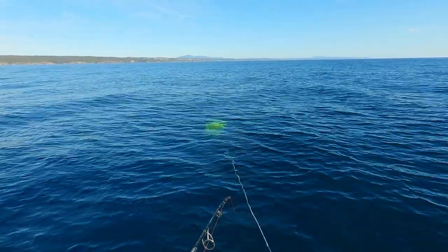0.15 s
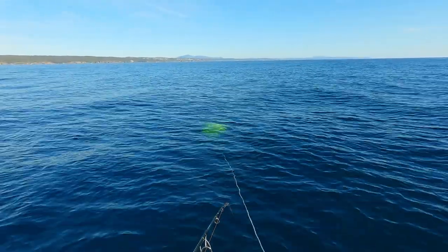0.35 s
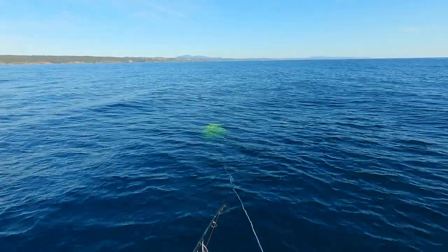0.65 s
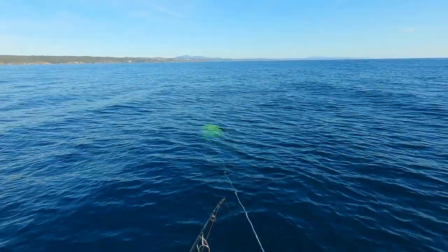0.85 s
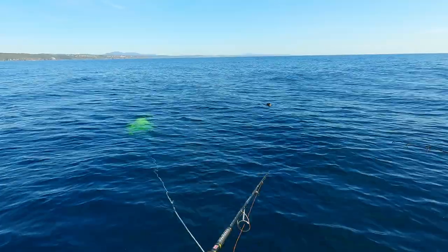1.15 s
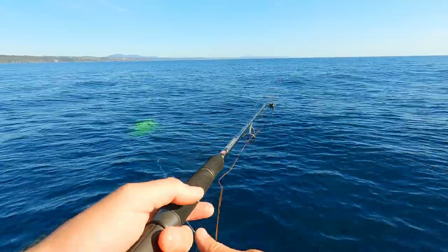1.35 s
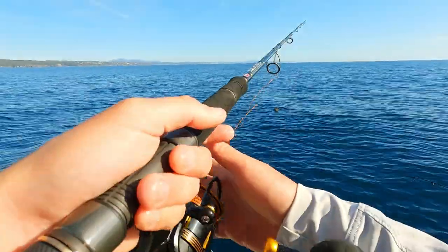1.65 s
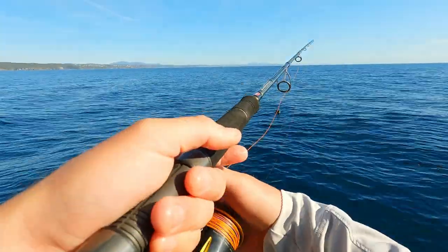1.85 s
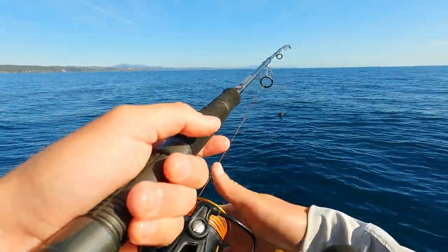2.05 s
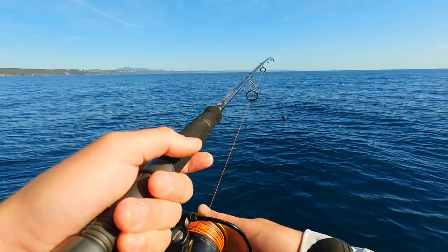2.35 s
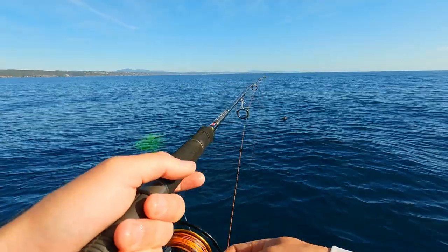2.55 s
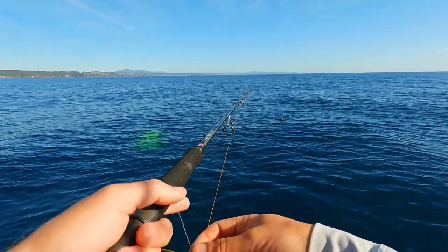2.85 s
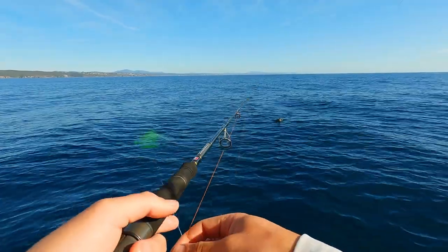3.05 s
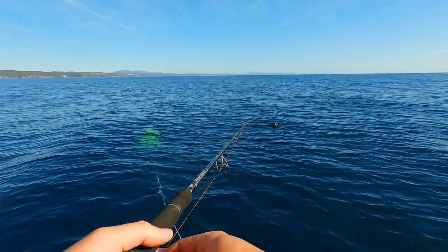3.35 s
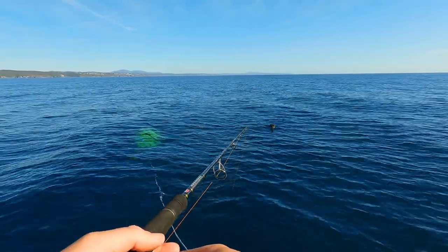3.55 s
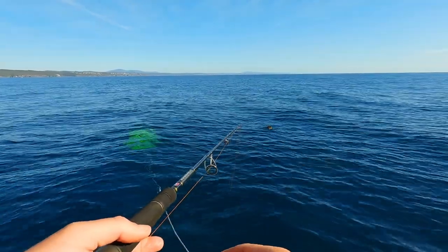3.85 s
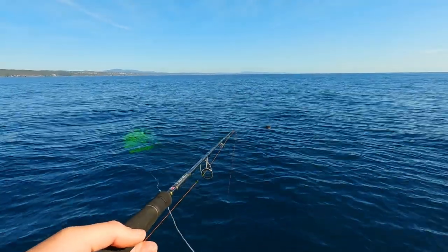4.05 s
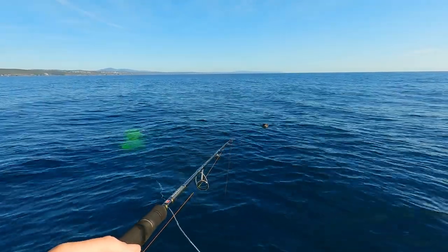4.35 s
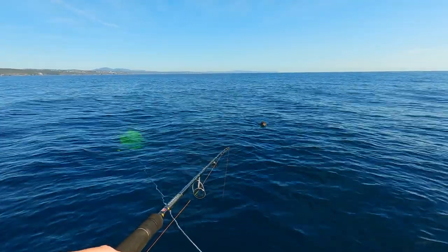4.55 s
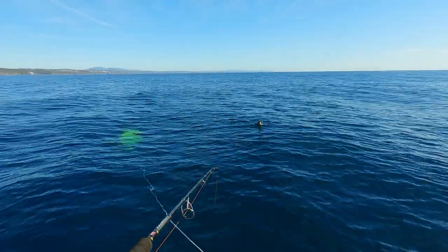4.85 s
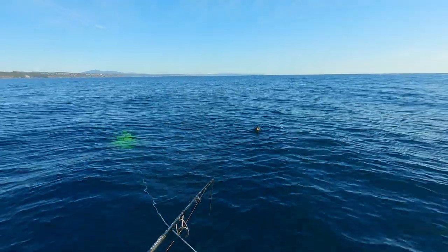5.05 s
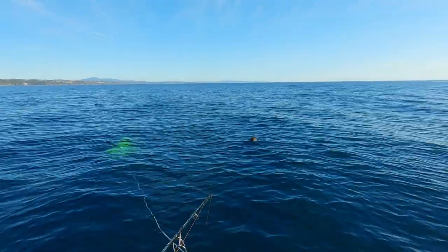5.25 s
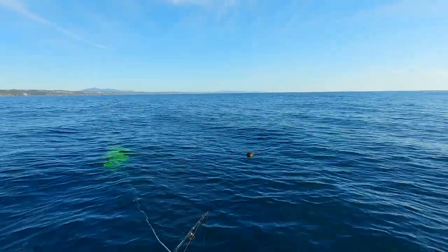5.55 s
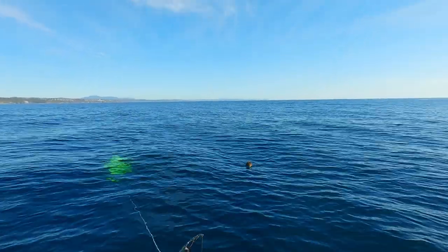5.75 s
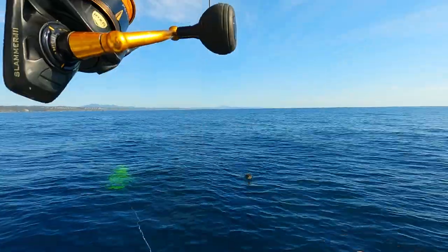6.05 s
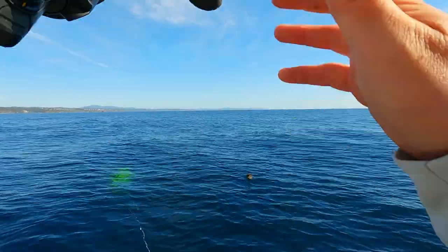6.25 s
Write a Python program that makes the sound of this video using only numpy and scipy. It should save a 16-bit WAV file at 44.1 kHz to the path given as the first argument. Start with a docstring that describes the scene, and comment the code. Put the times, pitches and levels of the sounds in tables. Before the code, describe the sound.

Water laps and bubbles at a boat's hull in a rumbling breeze, with sharp reel clicks, faint line whirr and a brief metallic squeak.

```python
"""Fishing from a drifting boat

Wavelets slap the hull and trap pockets of air, which gulp and bubble as resonators; larger waves thump it.
Close by, impacts excite the modes of a reel and its wire bail, and a metal part gives a short squeak.
Friction makes hands rustle and line whirr through the rod guides. Swell and breeze rumble underneath."""
import sys
import numpy as np
from scipy import signal
from scipy.fft import rfft, irfft
from scipy.io import wavfile
from scipy.ndimage import uniform_filter1d

SR = 44100
rng = np.random.default_rng(int(sys.argv[2]) if len(sys.argv) > 2 else 0)


def store_wav(level_fs):
    """Save 16-bit WAV to argv[1]."""
    pcm = np.round(np.clip(np.atleast_2d(level_fs), -1, 1) * 32767)
    wavfile.write(sys.argv[1], SR, pcm.T.astype(np.int16))


N = 282240


def gain(db):
    return 10 ** (np.asarray(db) / 20)

def unit_rms(x):
    return x / np.sqrt(np.mean(x ** 2) + 1e-20)

def times(seconds):
    return np.arange(round(seconds * SR)) / SR

def onset(t, rise_s):
    return np.minimum(t / rise_s, 1)

def decay(t, t60):
    """Exponential damping: the level falls 60 dB in t60 seconds."""
    return gain(-60 * t / t60)

def smooth(x, samples):
    """Two moving averages turn white noise into a slow fluctuation of unit RMS."""
    return unit_rms(uniform_filter1d(uniform_filter1d(x, samples), samples))

def bandpass(x, order, low_hz, high_hz):
    return signal.sosfilt(signal.butter(order, [low_hz, high_hz], "bandpass", fs=SR, output="sos"), x)

def at_frequency(rows, hz):
    knots, values = np.transpose(rows)
    return np.interp(np.log(hz + 1), np.log(knots + 1), values)

def at_time(rows, t):
    knots, *columns = np.transpose(rows)
    return [np.interp(t, knots, column) for column in columns]

def panned(x, pan_db):
    """Level difference sets direction: pan is left minus right in dB."""
    return np.array([x * gain(pan_db / 2), x * gain(-pan_db / 2)])

def add(mix, start, sound):
    part = mix[:, round(start * SR):][:, :sound.shape[1]]
    part += sound[:, :part.shape[1]]

def ring(modes, seconds, arch=0, top_s=0):
    """A sum of damped sinusoids; their pitch may follow a parabola, highest at top_s."""
    t = times(seconds)
    warped = t - arch * (t - top_s) ** 3 / 3
    return sum(gain(db) * decay(t, max(t60, 0.002)) * np.sin(2 * np.pi * hz * warped)
               for hz, db, t60 in modes)

# Each row: frequency in Hz, correlation between left and right.
COHERENCE = [(25, 0.83), (60, 1), (180, 1), (550, 0.83), (1650, 0.044), (4970, 0.29), (15000, 0.74)]

def noise(spectrum_db, patchy_db, flicker_db, size):
    """Partly coherent stereo noise of unit RMS, coloured by spectrum_db(hz, t), fluctuating at random."""
    hop = size // 4
    frames, hz = N // hop + 5, np.fft.rfftfreq(size, 1 / SR)[:, None]
    draws = rng.standard_normal((frames, len(hz), 5), dtype=np.float32).T
    left, independent = draws[0] + 1j * draws[1], draws[2] + 1j * draws[3]
    patches = unit_rms(uniform_filter1d(uniform_filter1d(draws[4], 5, axis=0), 8, axis=1))
    flicker = unit_rms(uniform_filter1d(rng.standard_normal(frames), 3))
    coherence = at_frequency(COHERENCE, hz)
    right = coherence * left + np.sqrt(1 - coherence ** 2) * independent
    colour = gain(spectrum_db(hz, np.arange(frames) * hop / SR))
    colour /= np.sqrt((colour ** 2).sum(0))
    spectra = np.array([left, right]) * colour * gain(patchy_db * patches + flicker_db * flicker)
    return unit_rms(signal.istft(spectra, nperseg=size, noverlap=size - hop)[1][:, :N])


# Wavelets on the hull. Each row: start in seconds, peak of the gulp in dB, air pocket's starting
# frequency in Hz, its t60 in seconds, splat level in dB relative to the gulp.
WAVELETS = [(0.103, -36, 586, 0.18, -22.5), (0.167, -40.5, 767, 0.058, -13.5),
            (0.567, -35, 399, 0.12, -28.5), (0.576, -39.5, 289, 0.065, -17.5),
            (0.934, -39.5, 804, 0.36, -21.5), (0.952, -37, 1391, 0.088, -7),
            (0.956, -42, 1680, 0.087, -18.5), (0.981, -33, 950, 0.2, -10.5),
            (0.999, -30, 1294, 0.07, -14.5), (1.001, -35, 1680, 0.066, -21.5),
            (1.018, -30.5, 304, 0.18, -17.5), (1.046, -45, 1080, 0.056, -18.5),
            (1.062, -39, 1270, 0.05, -18.5), (1.087, -35, 315, 0.27, -11.5), (1.114, -31, 430, 0.17, -8),
            (1.135, -40, 1016, 0.13, -9), (1.149, -39.5, 1700, 0.089, -16.5), (1.164, -35, 292, 0.11, -0.5),
            (1.166, -44.5, 792, 0.2, -9.5), (1.23, -18.5, 343.5, 0.17, -14), (1.289, -36, 352, 0.25, -13),
            (1.497, -42, 1200, 0.07, -13.5), (1.525, -32, 1094, 0.07, -5), (1.535, -34, 763, 0.067, -8.5),
            (1.547, -27, 632, 0.26, -17), (1.61, -43.5, 688, 0.3, -10.5), (1.972, -31, 1070, 0.069, -8),
            (1.993, -25, 515, 0.11, -6), (2.013, -23, 490, 0.073, -15.5), (2.039, -26.5, 337, 0.13, -11.5),
            (2.121, -34, 401, 0.071, -37), (2.168, -29, 370, 0.29, -18), (2.241, -32.5, 536, 0.2, -11),
            (2.326, -28, 490, 0.058, -7), (2.35, -21, 176, 0.14, -25.5), (2.442, -35.5, 1144, 0.082, -17),
            (2.456, -43.5, 926, 0.081, -13), (2.517, -29, 960, 0.067, -7), (2.518, -20.5, 460, 0.025, -10),
            (2.52, -24, 292, 0.099, -21.5), (2.537, -24.5, 202, 0.27, -8.5), (2.55, -24, 460, 0.036, -9),
            (2.579, -21.5, 513, 0.032, -16), (2.59, -19.5, 542, 0.045, -21.5),
            (2.605, -25.5, 768, 0.14, -19.5), (3.073, -40, 887, 0.11, -14), (3.227, -29.5, 920, 0.14, -9),
            (3.256, -31.5, 644, 0.072, -20.5), (3.344, -35.5, 859, 0.18, -30), (3.45, -35, 1390, 0.12, -14),
            (3.647, -31.5, 432, 0.1, -16), (3.988, -49.5, 1080, 0.043, -14),
            (4.009, -48.5, 1130, 0.058, -17), (4.046, -46.5, 1058, 0.038, -21),
            (4.052, -36, 416, 0.24, -24.5), (4.112, -38, 702, 0.14, -7.5), (4.307, -38, 494, 0.034, -29.5),
            (4.317, -17.5, 332, 0.095, -37), (4.512, -29.5, 627, 0.19, -20.5),
            (4.533, -36.5, 682, 0.051, -16), (4.863, -42.5, 814, 0.2, -4),
            (4.998, -42.5, 1130, 0.091, -15.5), (5.014, -37.5, 907, 0.12, -12.5),
            (5.031, -30, 496, 0.11, -10.5), (5.053, -34, 1145, 0.15, -11.5), (5.069, -21, 1022, 0.073, -15),
            (5.096, -29, 999, 0.2, -13.5), (5.12, -27, 666, 0.14, -15.5), (5.144, -32.5, 515, 0.06, -17.5),
            (5.417, -40.5, 580, 0.096, -6.5), (5.513, -37.5, 1404, 0.092, -9), (5.741, -31, 1090, 0.16, -7),
            (5.884, -26, 388, 0.055, -13), (5.902, -26.5, 465, 0.047, -23.5), (5.921, -29, 640, 0.11, -5),
            (5.927, -31.5, 857, 0.061, -7), (5.935, -23.5, 505, 0.06, -22),
            (5.951, -27.5, 412, 0.061, -20.5), (6.01, -34, 552, 0.14, -19.5),
            (6.332, -56.5, 636, 0.067, 16.5), (6.372, -31.5, 775, 0.14, -12.5)]
SHRINK_OCTAVES_PER_S, SWELL_S, FROTH_DB, SPRAY_DB = 1, 0.0032, -8, -12.5

def slaps():
    """An impact throws a broadband splat and spray; the trapped air resonates, rising as it shrinks."""
    out, t = np.zeros((2, N)), times(0.2)
    for start, db, hz, t60, splat_db in WAVELETS:
        wobble, lumps, foam, jet, water = rng.standard_normal((5, len(t)))
        pitch = hz * 2 ** (SHRINK_OCTAVES_PER_S * t) * (1 + 0.033 * unit_rms(uniform_filter1d(wobble, 250)))
        pocket = np.sin(2 * np.pi * np.cumsum(pitch) / SR) * onset(t, SWELL_S)
        froth = 1 + gain(FROTH_DB) * smooth(foam, 70)  # smears the pitch
        gurgle = gain(3 * smooth(lumps, 200))  # the pocket breaks up
        gulp = pocket * froth * gurgle * decay(np.maximum(t - SWELL_S, 0), max(t60, 0.02))
        splat = unit_rms(bandpass(water, 3, 420, 1400))
        spray = gain(SPRAY_DB) * unit_rms(bandpass(jet, 3, 1300, 4000))
        burst = gain(splat_db) * (splat + spray) * onset(t, 0.0053) * decay(t, 0.11)
        add(out, start, panned(gain(db) * (gulp / abs(gulp).max() + burst), 1))
    return out


# Waves on the hull. Each row: start in seconds, level in dB, frequency in Hz, t60 in seconds.
HULL_THUMPS = [(2.527, -11.5, 65, 0.7), (2.584, -13.5, 107, 0.18), (2.616, -9.5, 62, 0.17),
               (2.637, -12, 62, 0.12), (2.769, -17.5, 39, 0.78), (3.001, -18, 23, 0.49),
               (3.137, -19, 30, 0.61), (5.902, -20, 200, 0.16), (6.026, -13, 9.2, 1)]

def thumps():
    """A soft impact drives one low, damped mode of the hull."""
    out, t = np.zeros((2, N)), times(0.6)
    for start, db, hz, t60 in HULL_THUMPS:
        add(out, start, panned(ring([(hz, db, t60)], 0.6) * onset(t, 0.009), 0.36))
    return out


# Each row: start in seconds, level in dB, first and last frequency in Hz, duration in seconds.
SINGLE_BUBBLES = [(0.162, -48, 2680, 3150, 0.009), (0.231, -62, 2600, 2870, 0.0099),
                  (0.538, -64, 2070, 1900, 0.0082), (0.574, -53, 2090, 2450, 0.01),
                  (0.593, -60, 2440, 2600, 0.01), (0.599, -57, 1280, 1330, 0.012),
                  (0.603, -65, 2830, 2950, 0.01), (0.655, -61, 2880, 3000, 0.01),
                  (0.682, -57, 2520, 2600, 0.012), (0.697, -62, 3150, 3300, 0.01),
                  (0.831, -46, 1600, 1710, 0.022), (1.202, -35, 818, 2200, 0.04),
                  (2.112, -56, 1900, 1960, 0.089), (2.216, -46, 619, 584, 0.039),
                  (2.313, -44, 1910, 1350, 0.02), (2.375, -44, 2010, 1950, 0.015),
                  (2.808, -54, 1526, 1510, 0.04), (2.903, -37.5, 559, 1600, 0.046),
                  (2.957, -43, 1410, 1430, 0.024), (2.966, -49, 582, 985, 0.048),
                  (3.08, -49.5, 974, 827, 0.067), (3.418, -50, 1800, 1720, 0.024),
                  (3.503, -47, 1450, 1400, 0.046), (3.622, -49, 1950, 1880, 0.035),
                  (3.665, -44, 1910, 1920, 0.0094), (3.693, -58, 3430, 3500, 0.011),
                  (3.711, -57.5, 1305, 1260, 0.04), (3.75, -59, 1464, 1460, 0.03),
                  (3.82, -61, 1430, 1450, 0.012), (3.837, -58, 1543, 1540, 0.018),
                  (4.043, -49.5, 1480, 1420, 0.032), (2.612, -43, 1930, 2080, 0.015),
                  (4.189, -58.5, 1330, 1330, 0.026), (4.225, -56, 1340, 1330, 0.052),
                  (4.517, -45, 2670, 2780, 0.02), (5.026, -48, 2290, 2490, 0.035),
                  (5.751, -46, 1200, 1028, 0.085), (5.997, -49, 414, 1240, 0.055)]
SPATTER_DB = -18

def bubbles():
    """A bubble's resonance glides unsteadily as it nears the surface, in a spatter of finer drops."""
    out = np.zeros((2, N))
    for start, db, first_hz, last_hz, seconds in SINGLE_BUBBLES:
        progress = np.linspace(0, 1, round(seconds * SR))
        drift = unit_rms(uniform_filter1d(rng.standard_normal((4000, 2)), 160, axis=0))
        waver, flutter = drift[:len(progress)].T
        pitch = first_hz * (last_hz / first_hz) ** progress * (1 + 0.027 * waver)
        tone = np.sin(2 * np.pi * np.cumsum(pitch) / SR) * gain(3 * flutter)
        add(out, start, panned(gain(db) * tone * np.sin(np.pi * progress ** 1.05), 5))
        spikes = rng.standard_normal((2, round(0.1 * SR))) ** 3
        drops = unit_rms(bandpass(spikes, 2, 0.61 * first_hz, 1.34 * last_hz))
        add(out, max(start - 0.03, 0), gain(db + SPATTER_DB) * drops * np.hanning(drops.shape[1]))
    return out


# Broad resonances of the reel. Each row: centre in Hz, width in Hz, relative level in dB.
REEL_RESONANCES = [(1930, 550, -5), (2400, 400, -3), (4450, 800, 0), (7300, 1600, 3), (9400, 1100, -1.5),
                   (11340, 900, -15.5), (13600, 1200, -25)]

def snap(t, rattle_db):
    """A brief impact is broadband: the reel's resonances filter it, and a duller rattle follows."""
    shared, left, right, loose = rng.standard_normal((4, len(t)))
    rise = onset(t, 0.0006)
    hit = (shared + 0.4 * np.array([left, right])) * rise * decay(t, 0.0045)
    crack = sum(gain(db) * signal.lfilter(*signal.iirpeak(hz, hz / width, fs=SR), hit)
                for hz, width, db in REEL_RESONANCES)
    crack = signal.sosfilt(signal.butter(4, 13200, fs=SR, output="sos"), crack)
    sides = np.array([right, left])[:, ::-1]  # reversed, so unrelated to the crack
    rattle = unit_rms(bandpass(loose + 0.34 * sides, 3, 1000, 9500))
    return crack / abs(crack).max() + gain(rattle_db) * rattle * rise * decay(t, 0.07)


# Modes of the wire bail, the reel body and the thin ring left as the bail lands.
# Each row: frequency in Hz, level in dB, t60 in seconds.
BAIL_MODES = [(4470, 9.5, 0.0054), (6530, 5.5, 0.024), (6900, -6, 0.015), (7280, -16, 0.022),
              (7580, -9, 0.01), (8700, -19, .01), (9900, -17, 0.0087)]
BODY_MODES = [(640, 1, 0.0041), (952, -7, 0.013), (1400, -6, 0.029), (1937, -9.5, 0.011), (3500, -14, 0.05)]
LANDING_MODES = [(6120, -46, 0.3)]
# Each row: start in seconds, crack peak in dB, bail gain in dB, body gain in dB, factor on t60,
# rattle in dB relative to the crack, pan in dB.
REEL_CLICKS = [(1.7429, -10.5, -26, -36, 0.4, -28.5, 1), (1.8037, -35.5, -55, -50, 0.4, -11.5, 0),
               (1.8143, 1.5, -6, -25.5, 0.34, -32, -0.5), (1.8315, -21, -31.5, -30, 0.3, -31, -1),
               (1.8330, -2.5, -3.5, -7, 0.4, -15, 0), (1.8368, -12.5, -22, -30, 0.5, -20.5, -3.5),
               (1.84, -20, -14, -25, 1.05, -19, 2), (1.848, -16, -22, -18.5, 1.16, -19.5, -4.5),
               (1.8635, -10, -27.5, -21, 0.6, -17, 3), (1.868, -23.5, -20.5, -15.5, 1.06, -20, -2),
               (1.887, -11, -14, -41.5, 0.88, -22, -1.5), (1.8935, -11.5, -15.5, -40, 0.88, -23.5, -0.5),
               (5.8353, -25, -32, -15.5, 0.76, -6.5, 2), (5.842, -43, -50, -22.5, 1.4, -15, -9),
               (6.104, -61, -53, -28, 1.05, -27.5, 11.5), (6.113, -8, -18, -34, 0.56, -22.5, -2),
               (6.1354, -22.5, -39, -22.5, 1.6, -18, 3)]
BAIL_LANDS_S = 1.9

def reel():
    """Each click excites the modes of bail and body; a thin ring lingers when the bail lands."""
    out, t = np.zeros((2, N)), times(0.06)
    for start, db, bail_db, body_db, t60_factor, rattle_db, pan_db in REEL_CLICKS:
        modes = [(hz, mode_db + part_db, t60 * t60_factor)
                 for part, part_db in [(BAIL_MODES, bail_db), (BODY_MODES, body_db)]
                 for hz, mode_db, t60 in part]
        rings = ring(modes, 0.06)
        rings = np.array([np.roll(rings, 1), rings])  # reaches the right one sample sooner
        click = gain(db) * snap(t, rattle_db) + rings * onset(t, 0.0009)
        add(out, start, click * panned(np.ones(1), pan_db))
    landing = ring(LANDING_MODES, 0.09)
    add(out, BAIL_LANDS_S, panned(landing * signal.windows.tukey(len(landing), 0.2), 0))
    return out


# Partials of a metallic squeak. Each row: frequency in Hz, relative level in dB, t60 in seconds.
SQUEAK_PARTIALS = [(675, -20, 0.14), (1386, -2, 0.31), (2070, -14.5, 0.15), (2840, -6.5, 0.088),
                   (3670, -8, 0.061), (4370, 1, 0.029), (5880, -7, 0.069)]
# A tick, then the squeak. Each row: start in seconds, gain in dB, rise in seconds, factor on t60,
# seconds until the highest pitch, pan in dB.
TICK_AND_SQUEAK = [(6.115, -8, 0.0019, 0.16, 0.002, 4.5), (6.134, -20.5, 0.023, 1.18, 0.033, 1.5)]
ARCH_PER_S2, SQUEAK_S = 18, 0.105

def squeak():
    """A tick, then a metallic squeak: near-harmonic partials fuse into one pitch that arches and stops."""
    out, t = np.zeros((2, N)), times(SQUEAK_S)
    for start, db, rise_s, t60_factor, top_s, pan_db in TICK_AND_SQUEAK:
        partials = [(hz, partial_db, t60 * t60_factor) for hz, partial_db, t60 in SQUEAK_PARTIALS]
        tone = ring(partials, SQUEAK_S, ARCH_PER_S2, top_s)
        roughness_db = 2.5 * smooth(rng.standard_normal(8000), 90)[:len(t)]
        envelope = onset(t, rise_s) * np.sqrt(np.linspace(1, 0, len(t)))
        add(out, start, panned(gain(db + roughness_db) * tone * envelope, pan_db))
    return out


# Water between slaps, plus a brief swish of handling near 3.46 s.
# Each row: time in seconds, level in dB, spectral centre in Hz.
SLOSH_DRIFT = [(0.0, -54, 403.7), (0.2, -65.5, 502), (0.8, -64, 400), (0.9, -51, 1109), (0.98, -47, 1285),
               (1.1, -56.5, 905), (1.25, -44.5, 1250), (1.38, -55, 490), (1.9, -58.5, 448),
               (2.7, -48.5, 449), (2.9, -54, 444), (3.38, -60.5, 726), (3.46, -47, 1270),
               (3.56, -77.5, 412), (4.1, -66, 469), (4.7, -60, 414), (4.95, -65, 571), (5.08, -38, 900),
               (5.15, -49, 700), (5.22, -64.5, 425), (5.72, -57, 609), (5.86, -50.5, 499), (5.93, -41, 488),
               (6.05, -45, 600), (6.27, -60.5, 704), (6.36, -41, 712)]
CHURN_DB, CHURN_RISE_S, CHURN_T60_S = -4, 0.0027, 0.34

def churn(t):
    """Incoherent powers add: drift and slaps give a level in dB and a power-weighted centre in Hz."""
    level_db, hz = at_time(SLOSH_DRIFT, t)
    power = gain(2 * level_db)
    weighted_log_hz = power * np.log(hz)
    for start, db, pocket_hz, _, splat_db in WAVELETS:
        age = np.maximum(t - start, 0)
        stirred = onset(age, CHURN_RISE_S) * (gain(db + splat_db + CHURN_DB) * decay(age, CHURN_T60_S)) ** 2
        power += stirred
        weighted_log_hz += stirred * np.log(pocket_hz)
    return 10 * np.log10(power), np.exp(weighted_log_hz / power)

def impulses(per_s, spread_db):
    """A Poisson process: independent impulses of uneven height."""
    return gain(spread_db * np.minimum(rng.exponential(1, N), 4)) * (rng.random(N) < per_s / SR)

def fizz():
    """Small bubbles ring at random as damped, rising oscillators; the lower ones are louder and longer."""
    out = np.zeros(N)
    births, size_class = impulses(per_s=112, spread_db=2.2), rng.integers(0, 12, N)
    for k, hz in enumerate(np.geomspace(380, 1500, 12)):
        cycles = np.arange(round(14 * SR / hz)) * hz / SR
        envelope = np.exp(-cycles / 2.6) * np.minimum(cycles / 0.31, 1)
        bubble = np.sin(2 * np.pi * cycles * (1 + 0.017 * cycles)) * envelope
        out += signal.oaconvolve(births * (size_class == k), bubble)[:N] * (500 / hz) ** 2.5
    return unit_rms(out)

def slosh(t):
    """Noise around a moving spectral peak, with small bubbles: churning water and one swish of handling."""
    def spectrum_db(hz, frame_s):
        octaves = np.log2((hz + 1) / churn(frame_s)[1])
        skirts_db = np.where(octaves > 0, -7 * octaves, 9 * octaves)
        peak_db = -6 * np.minimum(abs(octaves) / 0.16, 1)
        treble_db = -16 * np.maximum(np.log2((hz + 1) / 1700), 0)
        return skirts_db + peak_db + treble_db
    wash = noise(spectrum_db, patchy_db=7.7, flicker_db=0.58, size=512)
    level_db = np.interp(t, t[::128], churn(t[::128])[0])
    return gain(level_db) * (wash + gain(-4) * panned(fizz(), 1.5))


# Hands, sleeve and line rubbing. Each row: time in seconds, level in dB, pan in dB.
RUBBING = [(0.0, -71, 5), (0.621, -77.5, 5), (0.805, -65.5, 6), (0.83, -58, 10), (0.89, -55, 10),
           (1.25, -52, 7), (1.651, -56, 2.5), (2.14, -56, 4), (2.26, -59, 3.5), (2.45, -51.5, 4.5),
           (2.67, -61.5, 4), (3.8, -61, 3), (3.991, -71, 5), (4.33, -56.5, 0), (4.54, -52.5, 2),
           (4.7, -66.5, 3), (4.849, -56.5, 0), (5.42, -64, 3.5), (5.48, -73.5, 8), (5.76, -65.5, 5),
           (5.86, -52, 4), (6.1, -44.5, 8.5), (6.13, -39.5, 15), (6.201, -54.5, 6.5), (6.36, -59, 5)]
# Each row: frequency in Hz, relative spectral density in dB.
RUBBING_SPECTRUM = [(500, -41), (1100, 0), (1500, -2.5), (2100, -7), (3000, -7.5), (4200, -12), (5700, -5),
                    (7200, -12), (8900, -21), (11000, -26), (12800, -33), (14000, -82), (16000, -110)]

def rustle(t):
    """Sliding friction makes fine noise, modulated by tiny snaps and uneven strokes, mostly on the left."""
    level_db, pan_db = at_time(RUBBING, t)
    rub = noise(lambda hz, _: at_frequency(RUBBING_SPECTRUM, hz), patchy_db=2.5, flicker_db=2.5, size=256)
    snaps = signal.oaconvolve(impulses(per_s=60, spread_db=1.5), np.exp(-np.arange(300) / 55))[:N]
    strokes_db = 2.5 * smooth(rng.standard_normal(N), 2500)
    return rub * (1 + 0.056 * snaps) * panned(gain(level_db + strokes_db), pan_db)


def tick_crack(t, hz):
    """A brief contact gives a wide band of noise around hz, with a faint tail; peak 1."""
    shared, left, right = rng.standard_normal((3, len(t)))
    envelope = onset(t, 0.00073) * (decay(t, 0.016) + 0.056 * decay(t, 0.065))
    burst = (shared + 0.28 * np.array([left, right])) * envelope
    crack = bandpass(burst, 5, hz / 5.6, min(hz * 1.69, 11000))
    return crack / abs(crack).max()

def tick_note(t, hz):
    """Narrowband noise is heard as a fuzzy pitch, here quickly damped; peak 1."""
    band = bandpass(rng.standard_normal(2 * len(t)), 2, 0.93 * hz, 1.07 * hz)[len(t):]
    note = band * onset(t, 0.00087) * decay(t, 0.031)
    return note / abs(note).max()

# Each row: start in seconds, crack peak in dB, note frequency in Hz, note in dB relative to the crack.
HANDLING_TICKS = [(0.6709, -47, 2770, -14), (0.8229, -43, 5700, -2), (0.852, -44.5, 5440, 2.5),
                  (0.8862, -46.5, 5650, 5), (0.9244, -59, 2100, -4), (0.9865, -40.5, 5660, 0),
                  (1.013, -41, 5600, -1), (1.075, -37, 5030, -14), (1.221, -36, 3500, -3),
                  (1.223, -33.5, 2750, -4), (1.261, -42, 5670, 7), (1.746, -38.5, 5920, 12),
                  (2.185, -55, 7440, 6), (2.242, -45.5, 2270, 2), (2.298, -23, 4440, -15),
                  (2.4286, -45, 5840, 14), (2.487, -27.5, 2840, -4.5), (2.488, -35.5, 7400, -5),
                  (2.5212, -22, 3500, -4), (2.9483, -44.5, 2050, 6.5), (3.639, -50, 5430, 11),
                  (3.64, -56, 6360, 10), (3.7861, -39.5, 5900, -18), (3.81, -53.5, 2920, 3),
                  (4.257, -41.5, 10860, -14.5), (4.307, -47, 2010, -24), (4.5605, -41, 9400, 1),
                  (4.6288, -42.5, 4840, -5), (4.772, -51, 7240, 2), (4.84, -54, 9200, -8),
                  (4.898, -36, 6000, -3), (4.9224, -46, 1900, -11), (5.12, -50, 10440, -7.5),
                  (5.5153, -56, 5680, 8), (5.73, -56, 7470, -3), (5.8018, -30, 5960, -3.5),
                  (5.816, -37, 2000, -12), (5.8895, -37, 3130, 0), (5.912, -42, 2140, -8),
                  (5.9135, -54, 7500, -12), (5.9393, -40.5, 4230, 1), (6.022, -36.5, 4170, -2)]
STRAY_COUNT, STRAY_DB, STRAY_NOTE_DB, TICK_PAN_SHARE = 16, -4, -12, 0.87

def ticks():
    """Small impacts of line and fingers sound from where the hands rub; faint strays fall at random."""
    out, t = np.zeros((2, N)), times(0.06)
    strays = []
    for when, pitch in rng.random((STRAY_COUNT, 2)):
        start = when * N / SR
        strays.append((start, at_time(RUBBING, start)[0] + STRAY_DB, 2000 * 3.5 ** pitch, STRAY_NOTE_DB))
    for start, db, hz, note_db in [*HANDLING_TICKS, *strays]:
        tick = tick_crack(t, hz) + gain(note_db) * tick_note(t, hz)
        pan_db = TICK_PAN_SHARE * at_time(RUBBING, start)[1]
        add(out, start, tick * panned(gain([db]), pan_db))
    return out


# Sleeve or line sweeping past. Each row: start and end in seconds, gain in dB,
# lower and upper band edge in Hz, pan in dB.
SWEEPS = [(1.775, 1.814, -49.5, 1300, 2280, -1), (2.707, 2.744, -55, 2130, 10800, 2),
          (2.33, 2.46, -53.5, 1270, 2240, 9), (3.6, 3.86, -64.5, 620, 8300, 2),
          (3.77, 3.875, -65, 1250, 2130, 2.5), (2.928, 2.977, -53.5, 604.8, 7600, 5),
          (3.382, 3.529, -45, 888.9, 6470, 0), (4.251, 4.352, -62, 5000, 12300, 2),
          (4.39, 4.454, -56.5, 2600, 8000, 2), (4.574, 4.645, -57, 2800, 9600, 2),
          (4.836, 4.863, -60.5, 4500, 12400, 0), (4.887, 4.92, -63, 4800, 12500, 0),
          (5.333, 5.427, -63.5, 1200, 8000, 3), (5.501, 5.539, -67.5, 4800, 7300, 14),
          (5.784, 5.87, -50.5, 666.7, 12700, 1), (5.95, 6.115, -47, 1667, 7315, 11)]

def swishes():
    """Friction noise grows with sliding speed: the hiss swells, then stops short."""
    out = np.zeros((2, N))
    for start, end, db, low_hz, high_hz, pan_db in SWEEPS:
        progress = np.linspace(0, 1, round((end - start) * SR))
        shared, left, right = rng.standard_normal((3, len(progress)))
        friction = unit_rms(bandpass(shared + 0.57 * np.array([left, right]), 4, low_hz, high_hz))
        envelope = (0.019 + 1.58 * progress) * signal.windows.tukey(len(progress), 0.3)
        add(out, start, friction * envelope * panned(gain([db]), pan_db))
    return out


# Line running through the rod. Each row: time in seconds, level in dB.
LINE_RUN = [(4.08, -92), (4.15, -58.5), (4.28, -70.5), (4.43, -59), (4.52, -55), (4.69, -64.5), (4.96, -51),
            (5.16, -69.5), (5.36, -57.5), (5.45, -80)]
# Each row: centre in Hz, width in Hz, relative level in dB.
GUIDE_RESONANCES = [(1250, 130, 5), (1550, 110, 4), (3000, 130, 2), (3530, 130, 5), (2720, 120, -7),
                    (5360, 250, -7), (5930, 300, -7), (6770, 260, -8), (7420, 500, -12), (9450, 260, -9),
                    (9000, 2500, -18), (11800, 1600, -24), (1300, 900, -2), (3200, 1500, -10)]

def whirr(t):
    """Forced vibration: the fluttering line drives the rod guides, which resonate at their own pitches."""
    def spectrum_db(hz, _):
        return 10 * np.log10(sum(gain(2 * db) / (1 + (2 * (hz - centre) / width) ** 2) ** 2
                                 for centre, width, db in GUIDE_RESONANCES))
    running = (t > LINE_RUN[0][0]) & (t < LINE_RUN[-1][0])
    flutter = noise(spectrum_db, patchy_db=4.5, flicker_db=3, size=768)
    return running * gain(at_time(LINE_RUN, t)[0]) * flutter


# Rumble of breeze and rolling hull, and wash of the sea. Each row: time in seconds, level in dB.
RUMBLE_LEVEL = [(0.0, -28.5), (0.7, -34), (1.45, -30), (1.9, -28), (2.44, -32.5), (2.58, -18.5),
                (2.68, -28), (3.0, -33.5), (3.25, -30), (3.56, -29.5), (3.97, -28), (4.6, -31),
                (5.25, -28.5), (5.6, -32), (5.97, -28), (6.4, -30)]
WASH_LEVEL = [(0.0, -41), (0.41, -37), (0.8, -44), (1.07, -47.5), (1.41, -38.5), (2.41, -42), (2.58, -43.5),
              (2.96, -40), (4.39, -43), (5.42, -44), (5.63, -45), (5.97, -37.5), (6.4, -43.5)]
# Their spectra. Each row: frequency in Hz, relative spectral density in dB.
RUMBLE_SPECTRUM = [(8.8, -22), (15, 2), (80, -2.5), (200, -18.5), (260, -41.5), (440, -120)]
WASH_SPECTRUM = [(60, -30.5), (120, 2.5), (170, -1.5), (250, -3.5), (350, -9.5), (480, -21), (700, -31),
                 (1000, -39), (2000, -100)]

def swell_and_breeze(t):
    """Moving air and water make low-frequency noise, nearly coherent between left and right."""
    rumble = noise(lambda hz, _: at_frequency(RUMBLE_SPECTRUM, hz), patchy_db=0.93, flicker_db=0.3, size=2048)
    wash = noise(lambda hz, _: at_frequency(WASH_SPECTRUM, hz), patchy_db=3.4, flicker_db=1.8, size=1024)
    return gain(at_time(RUMBLE_LEVEL, t)[0]) * rumble + gain(at_time(WASH_LEVEL, t)[0]) * wash


# Each row: frequency in Hz, relative spectral density in dB.
HISS_SPECTRUM = [(350, -35), (600, -4), (668, 0), (899, -17.5), (1310, -2.5), (2400, -28.5),
                 (4170, -31.5), (7350, -20), (8870, -46.5), (15000, -59.5)]
HISS_DB = -69

def hiss():
    """A faint floor of coloured noise lies under everything."""
    floor = noise(lambda hz, _: at_frequency(HISS_SPECTRUM, hz), patchy_db=1.2, flicker_db=0.6, size=1024)
    return gain(HISS_DB) * floor


def scene():
    """Superposition: the pressures of all sources add."""
    t = np.arange(N) / SR
    background = hiss() + swell_and_breeze(t) + slosh(t)
    friction = rustle(t) + swishes() + whirr(t)
    waves = slaps() + bubbles() + thumps()
    tackle = ticks() + reel() + squeak()
    return waves + tackle + friction + background


# Two microphone ports. Each row: frequency in Hz, phase lead of the left port in radians.
PORT_PHASE = [(60, 0), (1000, -.3), (2700, -.9), (3500, -1.2), (5300, .3), (8000, .05), (11500, .2),
              (13500, -.9)]
BAND_LIMIT_HZ = 16200

def record(dry):
    """The ports differ in phase; peaks clip at full scale, and a low-pass filter limits the bandwidth."""
    half_lead = at_frequency(PORT_PHASE, np.fft.rfftfreq(N, 1 / SR)) / 2
    ported = irfft(rfft(dry) * np.exp(1j * np.array([half_lead, -half_lead])), N)
    lowpass = signal.firwin(511, BAND_LIMIT_HZ, window=("kaiser", 9), fs=SR)
    return signal.oaconvolve(np.clip(ported, -1, 1), lowpass[None], "same")


dry = scene()
out = record(dry)
store_wav(out)
```